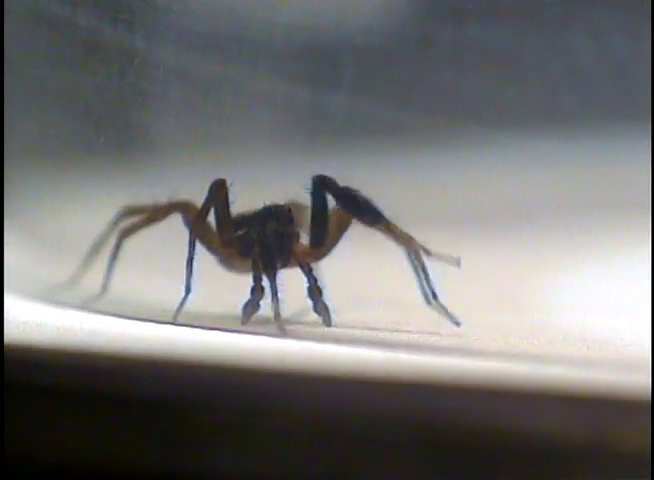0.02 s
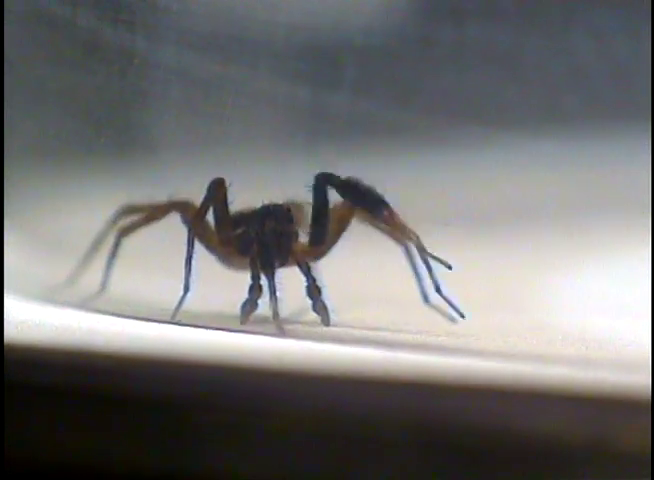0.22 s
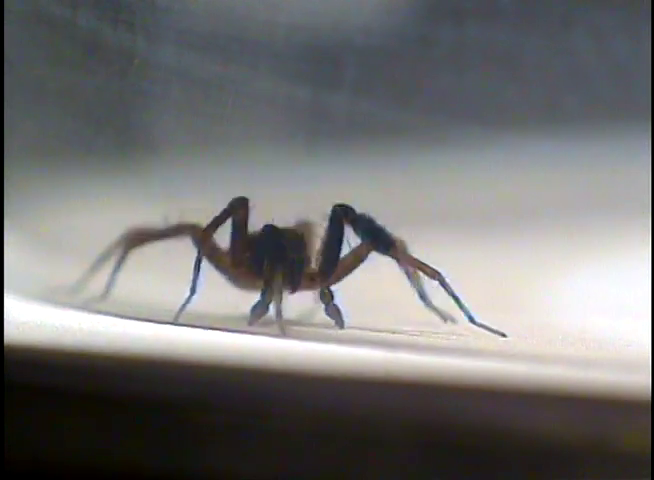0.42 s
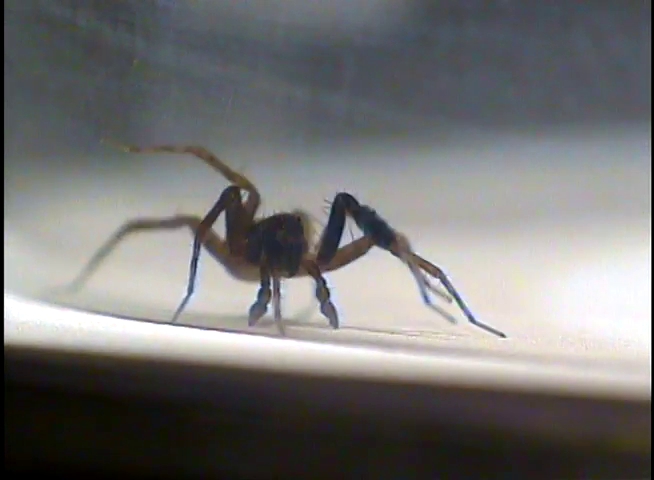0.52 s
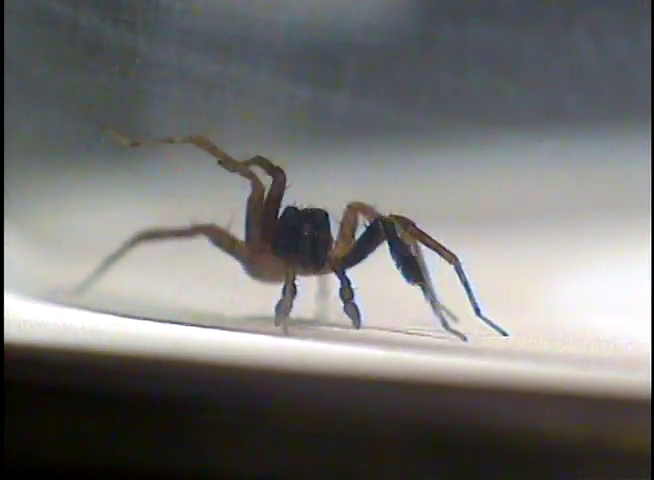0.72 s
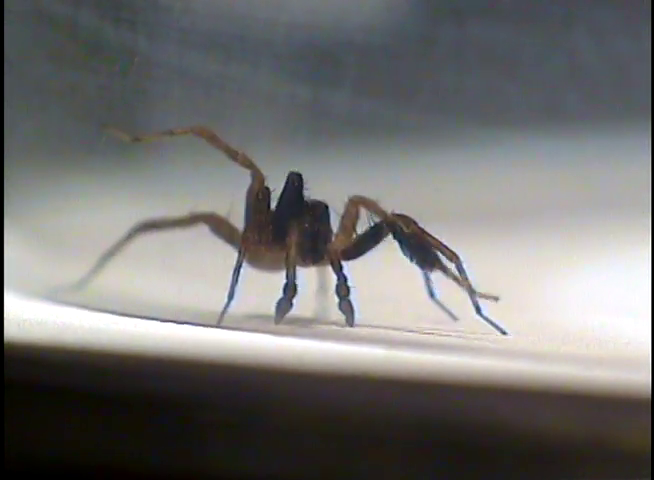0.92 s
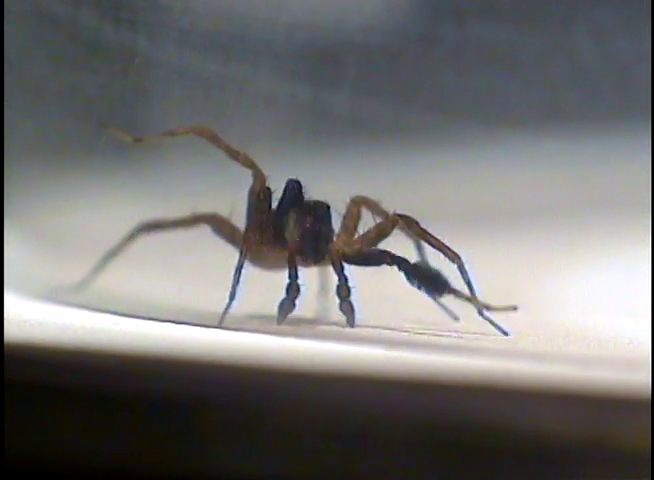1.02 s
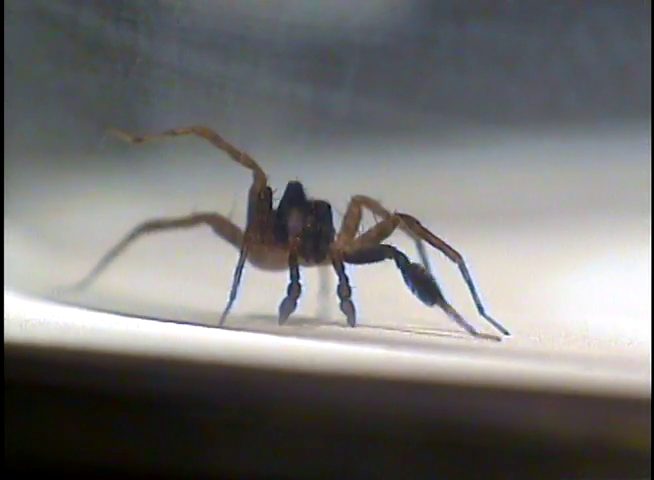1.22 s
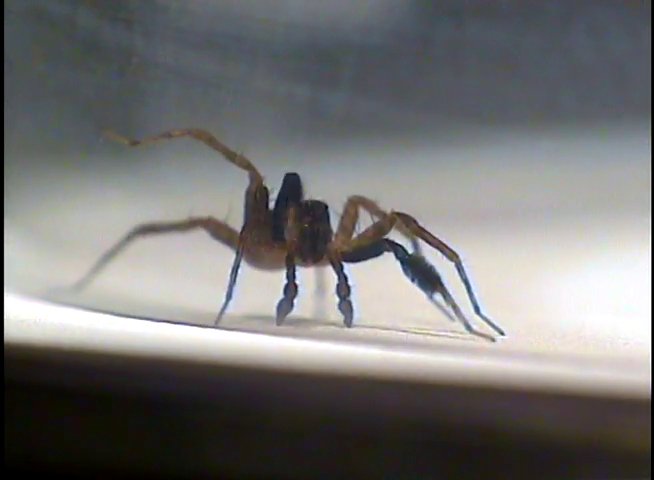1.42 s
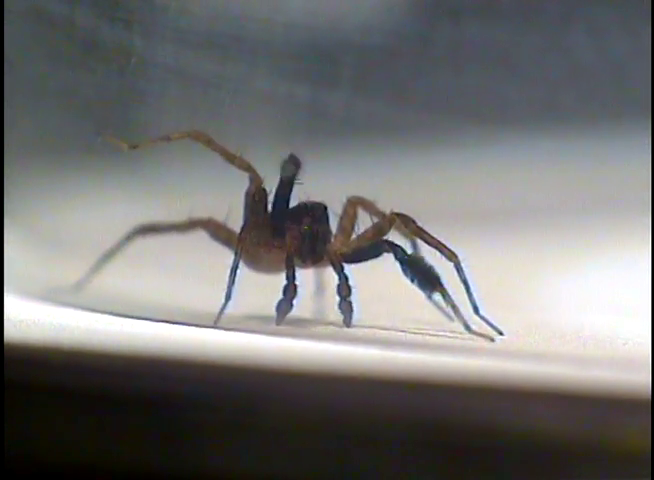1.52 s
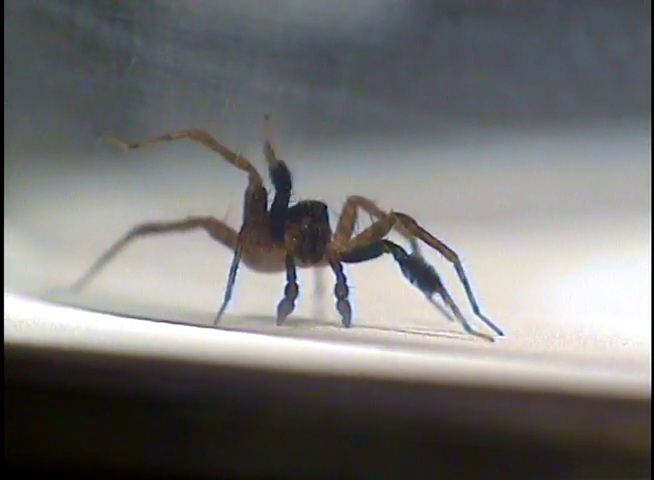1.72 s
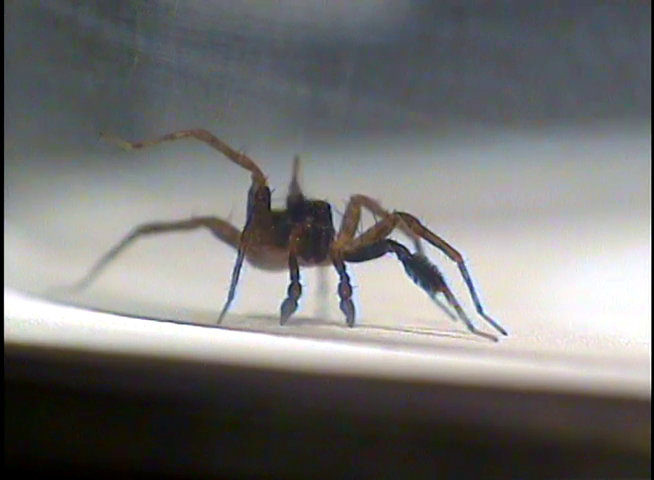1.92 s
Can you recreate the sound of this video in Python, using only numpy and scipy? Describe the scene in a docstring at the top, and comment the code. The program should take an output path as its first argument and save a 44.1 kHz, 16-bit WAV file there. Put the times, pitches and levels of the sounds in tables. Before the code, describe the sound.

Dry spider ticking and scraping through a thin sheet, two body thuds, faint steady electrical hum beneath.

```python
"""A courting wolf spider plays a thin stiff sheet, heard through a vibration pickup on the left channel only.
Its palps rasp as random slips ringing the sheet's modes, with a tick about every 40 ms as each stroke snaps free.
Harder scrapes swell and break off, and twice the body knocks the sheet as decaying sines with a noise crack.
Leg taps and leg-tip clicks are noise bursts; a trembling low tone, mains hum, support sway and noise lie below."""
import sys
import numpy as np
from scipy.fft import rfft, irfft, next_fast_len
from scipy.io import wavfile
from scipy.ndimage import uniform_filter1d, map_coordinates

SR = 44100
rng = np.random.default_rng(int(sys.argv[2]) if len(sys.argv) > 2 else 0)


def pcm_store(signal):
    """Save signal as 16-bit PCM."""
    levels = np.round(np.clip(np.atleast_2d(signal), -1, 1) * 32767)
    wavfile.write(sys.argv[1], SR, levels.astype(np.int16).T)


N = 88200


def amp(db):
    """Decibels to gain."""
    return 10 ** (np.asarray(db) / 20)


def unit(x):
    """Scale to rms 1."""
    return x / np.sqrt(np.mean(x ** 2) + 1e-20)


def level(points):
    """Gain per sample, interpolated in dB between (time_s, level_db) points."""
    return amp(np.interp(np.arange(N) / SR, *np.transpose(points)))


def coloured(x, colour, body=lambda f: 1):
    """Minimum-phase filter from (freq_hz, gain_db) points times a body response, scaled to energy 1."""
    m = next_fast_len(N + SR // 2) // 2 * 2
    f = np.fft.rfftfreq(m, 1 / SR)
    hz, db = np.transpose(colour)
    log_gain = np.log(amp(np.interp(np.log(f + 1), np.log(hz), db)))
    # folding the cepstrum forward makes the filter causal
    cepstrum = irfft(log_gain)
    cepstrum[1:m // 2] *= 2
    cepstrum[m // 2 + 1:] = 0
    h = np.exp(rfft(cepstrum)) * body(f)
    h = h / np.sqrt(np.mean(abs(h) ** 2))
    return irfft(rfft(x, m) * h, m)[:N]


def noise(colour):
    """Coloured noise of rms 1."""
    return unit(coloured(rng.standard_normal(N), colour))


def wobble(rate):
    """Smooth random curve through normal knots, rate knots per second."""
    knots = np.arange(N) / SR * rate
    return map_coordinates(rng.standard_normal(N // 40), [knots])


GRAIN_SPREAD_DB = 3.5


def slips(rate):
    """Tiny random slips of either sign and uneven size, rate per second on average, rms 1."""
    happens = rng.random(N) < rate / SR
    sign = rng.choice([-1, 1], N)
    size = amp(GRAIN_SPREAD_DB * rng.standard_normal(N))
    return unit(happens * sign * size)


def bursts(rows, t60, rise=.0001):
    """Rough contact forces: one decaying noise burst per (start_s, level_db) row; t60 and rise in s."""
    out, t = np.zeros(N + SR), np.arange(SR // 8) / SR
    for s, db in rows:
        envelope = amp(db - 60 * t / t60) * (1 - np.exp(-t / rise))
        out[int(s * SR):][:len(t)] += envelope * rng.standard_normal(len(t))
    return out[:N]


EDGE_DELAY_S, EDGE_GAIN = 0.001127, 0.21


def edge(f):
    """Direct wave plus its reflection from the sheet's near edge."""
    return 1 + EDGE_GAIN * np.exp(-2j * np.pi * f * EDGE_DELAY_S)


# sheet modes: freq_hz, knocked_db (before fall and scatter), t60_s, rubbed_db
MODES = [(126.4, 5.5, 0.21, 4.5), (185, -27.5, 0.77, 0.5), (244.9, 4.5, 0.13, 0), (303.6, -8.5, 0.18, -25),
         (357.6, -4, 0.14, 1), (404, 4, 0.084, -1.5), (543, 0, 0.045, -1), (613.8, -9.5, 0.071, 2.5),
         (656.7, 2.5, 0.072, -2.5), (790, -14, 0.1, -16.5), (845.7, -6, 0.034, 2), (948, -2.5, 0.052, -1.5),
         (1029.7, -18, 0.093, 3.5), (1330, -43, 0.026, 3.5), (1519, -15.5, 0.07, 0), (1695, -37, 0.049, 0),
         (2220, -40, 0.034, -4), (3276, -48, .015, -9), (4058, -50, 0.02, 2), (4720, -54, .018, -4),
         (5280, -54, 0.011, -9)]
DIRECT_DB = -6.5
TRAVEL_S = 0.001364  # bending-wave delay at 1 kHz, before the fixed advance of half of it


def sheet(f):
    """Direct wave plus resonant modes, dispersed: high bending waves arrive before low ones."""
    h = amp(DIRECT_DB) * edge(f)
    for hz, _, t60, db in MODES:
        width_hz = np.log(1000) / np.pi / t60
        damping = 1j * f * width_hz
        h = h + amp(db) * damping / (hz * hz - f * f + damping)
    cycles = 2 * TRAVEL_S * np.sqrt(1000 * f)
    return h * np.exp(-2j * np.pi * (cycles - f * TRAVEL_S / 2))


# palp rubbing effort: time_s, level_db
RASP = [(0, -54), (.10, -59.5), (.16, -56), (.19, -62.5), (.225, -81), (.235, -49.5), (.29, -56),
        (.33, -69.5), (.36, -45), (.41, -65), (.5, -59.5), (.58, -70), (.62, -67.5), (.72, -54.5),
        (.8, -61), (1.05, -59), (1.25, -59.5), (1.32, -58.5), (1.40, -55.5), (1.42, -66), (1.49, -77),
        (1.505, -48.5), (1.555, -62), (1.75, -61.5), (2, -59)]
# soft rubbing spectrum: freq_hz, gain_db
RASP_COLOUR = [(100, -14.5), (220, -1.5), (400, 7), (650, 3), (1000, -5.5), (1400, -8), (2300, -13.5),
               (3100, -22.5), (4500, -40), (6000, -35.5), (15000, -44.5)]
# fine grit spectrum, also for catches, taps and rattle: freq_hz, gain_db
GRIT_COLOUR = [(500, -17.5), (2000, -3), (3400, 7), (5000, -5), (6000, -12), (8000, -23), (10000, -15.5),
               (15000, -28)]
GRAIN_RATE_PER_S = 1600
GRIT_RATE_PER_S, GRIT_DB = 870, -30
GRIT_CLUMP_RATE_PER_S, GRIT_CLUMP_DB = 51, -12


def rasp():
    """Palps rub softly and ring the sheet by random slips; fine grit catches in uneven clumps."""
    effort = level(RASP)
    clumping = amp(GRIT_CLUMP_DB * wobble(GRIT_CLUMP_RATE_PER_S))
    grit = unit(slips(GRIT_RATE_PER_S) * clumping)
    soft = coloured(slips(GRAIN_RATE_PER_S) * effort, RASP_COLOUR, sheet)
    return soft + amp(GRIT_DB) * coloured(grit * effort, GRIT_COLOUR, sheet)


# trembling of the lowest mode: time_s, level_db
SHAKE = [(0, -47), (.19, -53.5), (.29, -45), (.45, -56.5), (.58, -54), (.75, -55), (.9, -49.5), (.99, -45),
         (1.09, -45), (1.16, -52.5), (1.3, -53.5), (1.36, -42.5), (1.4, -55.5), (1.49, -56), (1.56, -50),
         (1.68, -54.5), (1.745, -46.5), (1.81, -57.5), (1.96, -47.5)]
# trembling noise spectrum: freq_hz, gain_db
SHAKE_COLOUR = [(72, -48), (88, -11.5), (100, 15), (115, -15.5), (138, 3.5), (165, -41.5), (195, -6.5),
                (260, -22), (600, -72.5)]
SHAKE_HZ, SHAKE_WANDER_HZ, SHAKE_NOISE_DB = 122.1, 10.1, -3


def shake():
    """The spider's trembling keeps the lowest mode swinging at a wandering pitch, plus low noise."""
    hz = SHAKE_HZ + SHAKE_WANDER_HZ * wobble(rate=28)
    swing = np.sqrt(2) * np.sin(2 * np.pi * np.cumsum(hz) / SR)
    return level(SHAKE) * (swing + amp(SHAKE_NOISE_DB) * noise(SHAKE_COLOUR))


# mains hum: pitch_hz, rms_db
HUM = [(120, -57.5), (240, -71), (360, -73)]


def hum():
    """Mains hum: steady sines at random phase."""
    t = np.arange(N) / SR
    return sum(np.sqrt(2) * amp(db) * np.sin(2 * np.pi * (hz * t + rng.random())) for hz, db in HUM)


# support sway: time_s, level_db
SWAY = [(0, -50.5), (.17, -54), (.36, -43.5), (.65, -48), (.8, -51), (1.5, -50.5), (2, -53.5)]
# sway noise spectrum: freq_hz, gain_db
SWAY_COLOUR = [(10, -2.5), (22, -10.5), (30, 6.5), (38, -20.5), (58, -1.5), (74, -26.5), (150, -40.5),
               (400, -84)]
SWAY_HZ, SWAY_NOISE_DB = 26.9, -4.5


def sway():
    """The support sways at its own low pitch, plus low noise."""
    t = np.arange(N) / SR
    swing = np.sin(2 * np.pi * (SWAY_HZ * t + rng.random()))
    return level(SWAY) * (swing + amp(SWAY_NOISE_DB) * noise(SWAY_COLOUR))


# pickup noise spectrum: freq_hz, gain_db
FLOOR_COLOUR = [(50, 15.5), (200, 6.5), (600, -3), (1200, -9), (2400, -31), (3500, -38), (6000, -59),
                (15000, -41)]
FLOOR_DB = -60


def pickup_noise():
    """Steady coloured noise of the pickup."""
    return amp(FLOOR_DB) * noise(FLOOR_COLOUR)


# palp ticks: start_s, stroke_db, fizz_db, thump_db (each before its offset below)
TICKS = [(0.035, -41, -70, -56.5), (0.0715, -46.5, -90, -45.5), (0.2731, -40.5, -82, -64),
         (0.386, -37, -65, -43), (0.4254, -41.5, -74, -65.5), (0.463, -44.5, -75.5, -56),
         (0.504, -42.5, -79, -54), (0.633, -35.5, -66, -37.5), (0.6781, -45, -86, -46.5),
         (0.723, -44.5, -76.5, -43.5), (0.7654, -53, -88, -50), (0.839, -45, -71.5, -53.5),
         (0.8764, -48.5, -93, -49.5), (0.9542, -44, -81, -52), (0.9903, -45.5, -84, -49.5),
         (1.0644, -42, -83, -55), (1.103, -46, -82, -53.5), (1.2067, -45, -88, -49),
         (1.273, -48, -81, -52.5), (1.495, -40, -95, -59), (1.5144, -51, -90, -50),
         (1.5407, -50, -88.5, -76), (1.5963, -45.5, -93, -60), (1.637, -46.5, -98, -47),
         (1.6745, -52, -99, -70), (1.723, -48.5, -85, -48), (1.763, -47, -100, -48.5),
         (1.7968, -50.5, -103.5, -93), (1.8511, -50, -86, -45.5), (1.89, -48.5, -92, -48.5),
         (1.922, -51, -105, -60.5), (1.9722, -52, -82, -50)]
# tick scrape and knock chatter spectrum: freq_hz, gain_db
TICK_COLOUR = [(100, 0), (350, 0), (800, 9), (1500, 2.5), (2400, 0.5), (3300, -20.5), (5000, -26.5),
               (7000, -31), (15000, -43.5)]
# soft thump spectrum: freq_hz, gain_db
THUMP_COLOUR = [(100, -21), (180, 3.5), (300, -5.5), (650, -18.5), (1200, -23), (4000, -74.5)]
# sharp contact spectrum, for fizz, hiss and clicks: freq_hz, gain_db
CLICK_COLOUR = [(300, -8), (2000, -8), (4300, 8.5), (5800, -3), (7800, 9), (9500, -1.5), (12000, 4.5),
                (15000, -3)]
TICK_DB, TICK_RISE_S, TICK_T60_S = 2, 0.0033, 0.028
TICK_SNAP_DB, SNAP_LAG_S = 7.5, 0.002173
CATCH_DB, CATCH_T60_S = -17, 0.0083
TICK_FIZZ_DB, THUMP_DB = 11, 25


def ticks():
    """Each palp stroke catches with a fizz and a soft thump, scrapes briefly and snaps free."""
    stroke = bursts([(s, db + TICK_DB) for s, db, _, _ in TICKS], TICK_T60_S, TICK_RISE_S)
    push = np.zeros(N)
    for s, db, _, thump_db in TICKS:
        stroke[int((s + SNAP_LAG_S) * SR)] += amp(db + TICK_SNAP_DB)
        push[int(s * SR)] = amp(thump_db + THUMP_DB)
    catch = bursts([(s, db + CATCH_DB) for s, db, _, _ in TICKS], CATCH_T60_S, rise=0.0012)
    fizz = bursts([(s, db + TICK_FIZZ_DB) for s, _, db, _ in TICKS], t60=0.012, rise=0.0027)
    ringing = coloured(stroke, TICK_COLOUR, sheet)
    ringing = ringing + coloured(catch, GRIT_COLOUR, sheet) + coloured(push, THUMP_COLOUR, sheet)
    return ringing + coloured(fizz, CLICK_COLOUR, edge)


SCRAPE_GRAIN_RATE_PER_S, CLUMP_RATE_PER_S, CLUMP_DB = 1500, 250, 2.5


def clumps():
    """Slips that come in clumps while the rubbing keeps its mean strength."""
    x = slips(SCRAPE_GRAIN_RATE_PER_S) * amp(CLUMP_DB * wobble(CLUMP_RATE_PER_S))
    power = np.abs(uniform_filter1d(x ** 2, size=700))
    return x / np.sqrt(power + 1e-6)


# hard scrape strokes: peak_s, level_db, swell_db_per_s, hiss_db
SCRAPES = [(0.126, -51.5, 344, -73.5), (0.142, -41, 1294, -85), (0.154, -42.5, 1997, -74),
           (0.2288, -48, 7997, -81), (0.243, -48, 1200, -75), (1.373, -50.5, 326, -72),
           (1.386, -42, 1400, -89), (1.399, -43.5, 2198, -66.5)]
# hard scrape spectrum: freq_hz, gain_db
SCRAPE_COLOUR = [(200, -29), (480, -23), (650, 8), (950, 1.5), (1500, -2.5), (2300, -2.5), (3100, -17),
                 (4500, -26), (6000, -36), (15000, -51)]
SCRAPE_HOLD_S, SCRAPE_FALL_DB_PER_S = 0.0026, 1995
HISS_SWELL_DB_PER_S = 903  # added to the stroke's own swell


def scrapes():
    """Hard rubbing swells, holds and breaks off in clumps of slips; its hiss swells later and more steeply."""
    t, force, hiss = np.arange(N) / SR, 0, 0
    for s, db, swell, hiss_db in SCRAPES:
        before, after = np.maximum(s - t, 0), np.maximum(t - s - SCRAPE_HOLD_S, 0)
        pressure_db = -swell * before - SCRAPE_FALL_DB_PER_S * after
        force = np.maximum(force, amp(db + pressure_db))
        hiss = np.maximum(hiss, amp(hiss_db + pressure_db - HISS_SWELL_DB_PER_S * before))
    grains = clumps()
    return coloured(grains * force, SCRAPE_COLOUR, sheet) + coloured(grains * hiss, CLICK_COLOUR, edge)


# light leg taps: start_s, level_db
TAPS = [(0.253, -79), (0.4015, -66), (0.477, -63.5), (0.65, -67.5), (0.6855, -59), (0.696, -68),
        (0.7215, -65.5)]
TAP_T60_S = 0.016


def taps():
    """Legs settle on the sheet: short thin noise bursts through its modes."""
    return coloured(bursts(TAPS, TAP_T60_S, rise=0.00082), GRIT_COLOUR, sheet)


# body knocks: start_s, thud_db, crack_db, fall_db_per_octave (modes, either side of CONTACT_HZ)
KNOCKS = [(0.3462, -32.5, -34.5, 10), (0.5952, -27.5, -31, 0.5)]
# knock crack spectrum: freq_hz, gain_db
CRACK_COLOUR = [(100, 0), (700, 6), (1200, 1), (2400, -2), (3300, -13), (4200, -8.5), (6000, -17.5),
                (9000, -26), (15000, -54.5)]
CONTACT_HZ, THUD_RISE_S, CRACK_T60_S = 240, 0.0036, 0.0093
REBOUND_S, REBOUND_DB, REBOUND_CRACK_DB, REBOUND_T60_S = .0175, -11.5, -8.5, 0.02
CHATTER_DB, CHATTER_T60_S = -11, 0.11
RATTLE_DB, RATTLE_T60_S = -31, 0.15


def struck_modes(t, fall):
    """Decaying sines of alternating sign, weaker away from the contact's pitch, levels scattered by 1 dB."""
    ring = 0
    for k, (hz, knocked_db, t60, _) in enumerate(MODES):
        start_db = knocked_db - fall * abs(np.log2(hz / CONTACT_HZ)) + rng.normal(0, 1)
        ring = ring + (-1) ** k * amp(start_db - 60 * t / t60) * np.sin(2 * np.pi * hz * t)
    return ring


def knocks():
    """The body strikes with a crack, rings the modes, chatters, rebounds once and leaves a fine rattle."""
    thud, t = np.zeros(N + SR), np.arange(SR // 2) / SR
    rise = 1 - np.exp(-t / THUD_RISE_S)
    for s, db, _, fall in KNOCKS:
        for delay, change_db in [(0, 0), (REBOUND_S, REBOUND_DB)]:
            thud[int((s + delay) * SR):][:len(t)] += amp(db + change_db) * struck_modes(t, fall) * rise
    hits = [(s, db) for s, _, db, _ in KNOCKS]
    crack = bursts(hits, CRACK_T60_S)
    rebound = bursts([(s + REBOUND_S, db + REBOUND_CRACK_DB) for s, db in hits], REBOUND_T60_S, rise=0.00017)
    chatter = bursts([(s, db + CHATTER_DB) for s, db in hits], CHATTER_T60_S, rise=0.00097)
    rattle = bursts([(s + REBOUND_S / 2, db + RATTLE_DB) for s, db in hits], RATTLE_T60_S)
    rattle = rattle * slips(GRIT_RATE_PER_S)
    loose = coloured(chatter, TICK_COLOUR, sheet) + coloured(rattle, GRIT_COLOUR, sheet)
    return thud[:N] + coloured(crack + rebound, CRACK_COLOUR, sheet) + loose


# leg-tip clicks: start_s, level_db (before CLICK_DB)
CLICKS = [(0.685, -68), (0.697, -65), (0.954, -73.5), (0.975, -71), (1.027, -71.5), (1.138, -72.5),
          (1.305, -74), (1.328, -71), (1.341, -70), (1.5073, -73), (1.513, -71), (1.544, -72),
          (1.801, -75.5), (1.923, -76)]
CLICK_DB, CLICK_T60_S = 0.5, 0.0053
KNOCK_SNAP_DB, KNOCK_SNAP_T60_S = -13, 0.0019


def clicks():
    """Leg-tip touches and the first instant of each knock: too brief to ring the sheet, so edge echo only."""
    tips = bursts([(s, db + CLICK_DB) for s, db in CLICKS], CLICK_T60_S)
    snaps = bursts([(s, db + KNOCK_SNAP_DB) for s, _, db, _ in KNOCKS], KNOCK_SNAP_T60_S)
    return coloured(tips + snaps, CLICK_COLOUR, edge)


def scene():
    """The pickup feeds the left channel; the right is silent."""
    spider = rasp() + shake() + ticks() + scrapes() + taps() + knocks() + clicks()
    background = hum() + sway() + pickup_noise()
    left = 2 * (spider + background)
    return np.array([left, np.zeros(N)])


TOP_HZ, FADE_S = 15720, .004


def record(dry):
    """The recorder keeps nothing above its band limit; the ends fade briefly."""
    m, t = next_fast_len(N + SR // 2), np.arange(N) / SR
    fade = np.minimum(np.minimum(t, t[::-1]) / FADE_S, 1)
    in_band = np.fft.rfftfreq(m, 1 / SR) < TOP_HZ
    return irfft(rfft(dry * fade, m) * in_band, m)[:, :N]


dry = scene()
out = record(dry)
pcm_store(out)
```